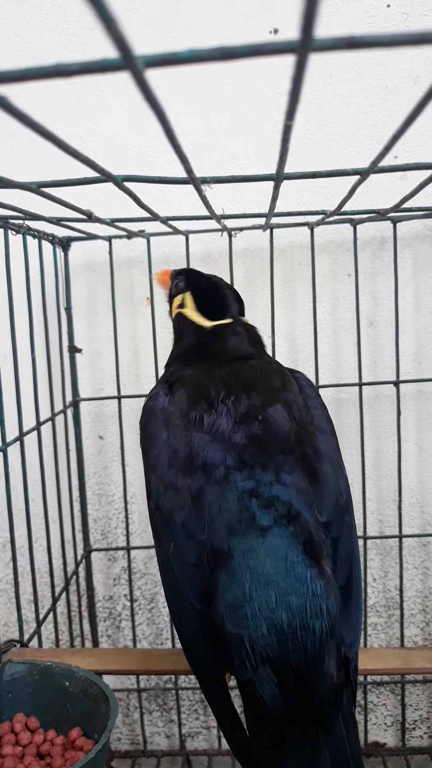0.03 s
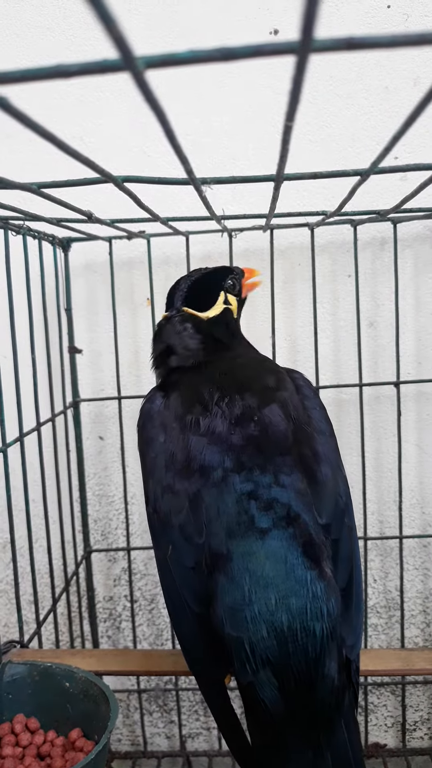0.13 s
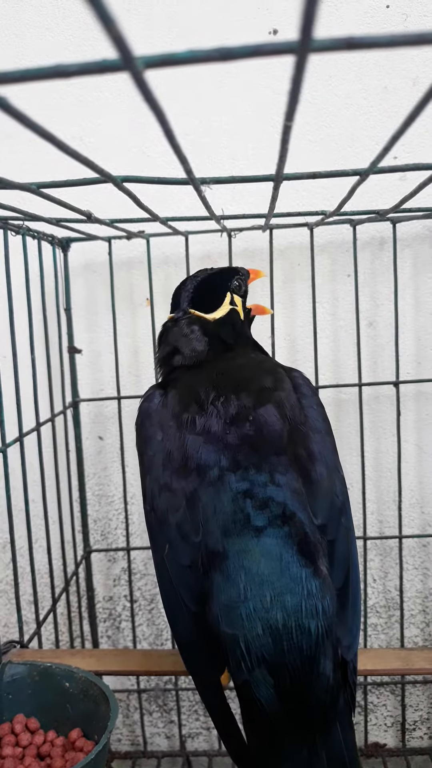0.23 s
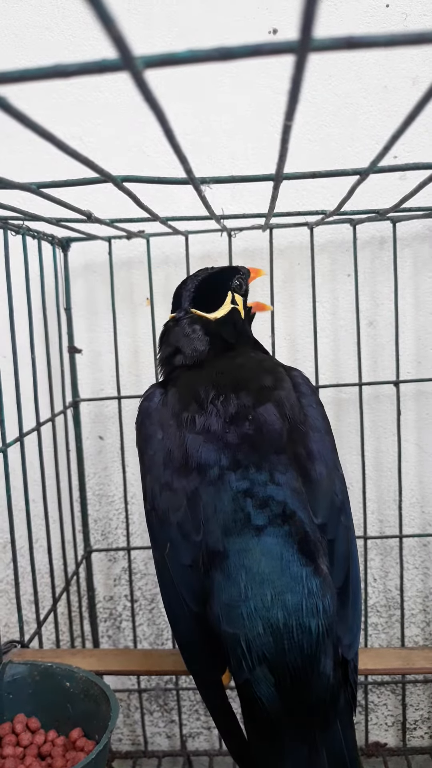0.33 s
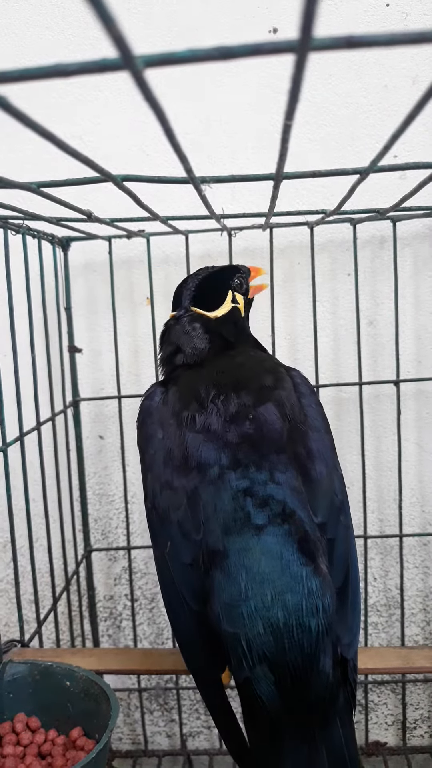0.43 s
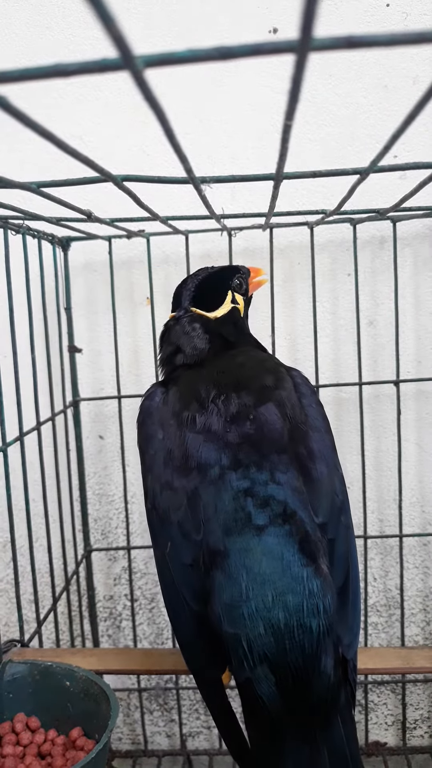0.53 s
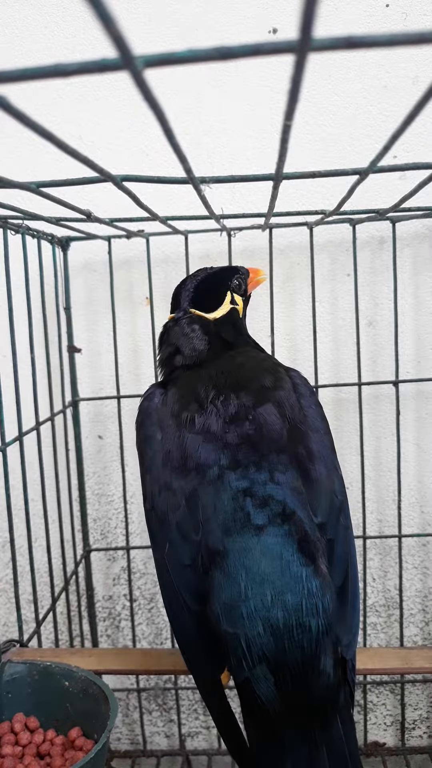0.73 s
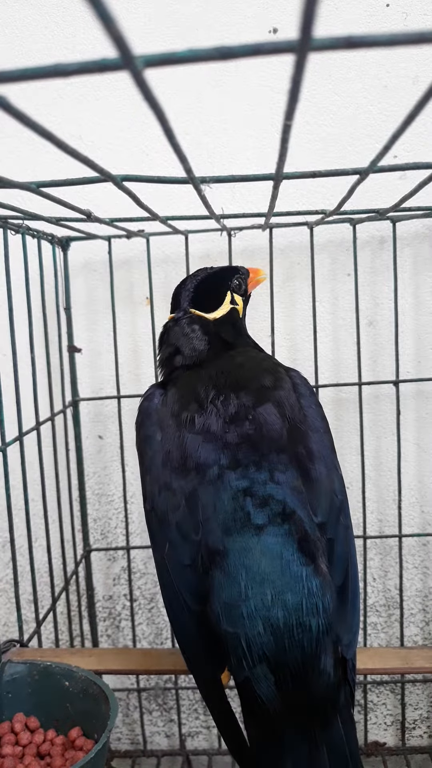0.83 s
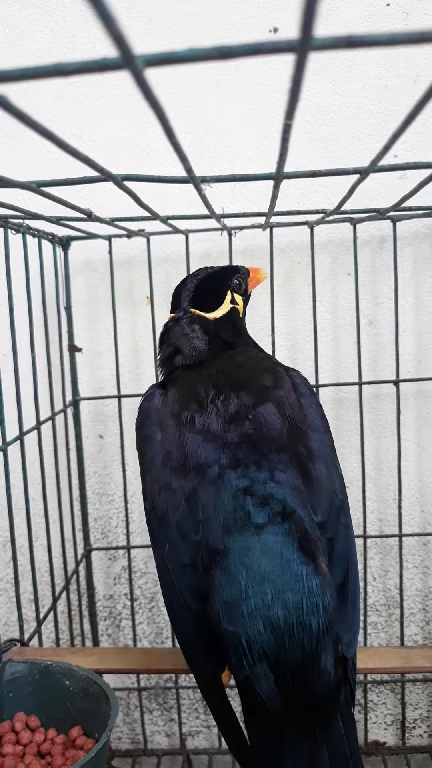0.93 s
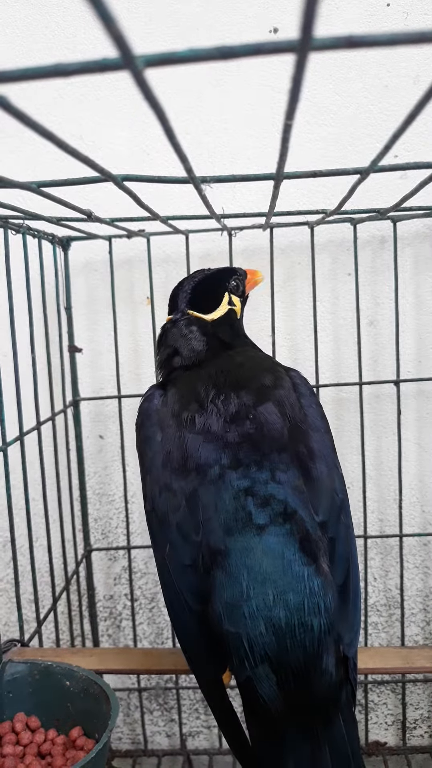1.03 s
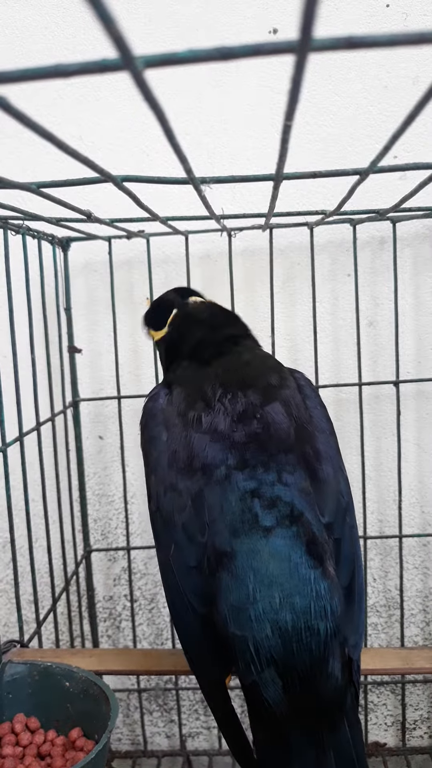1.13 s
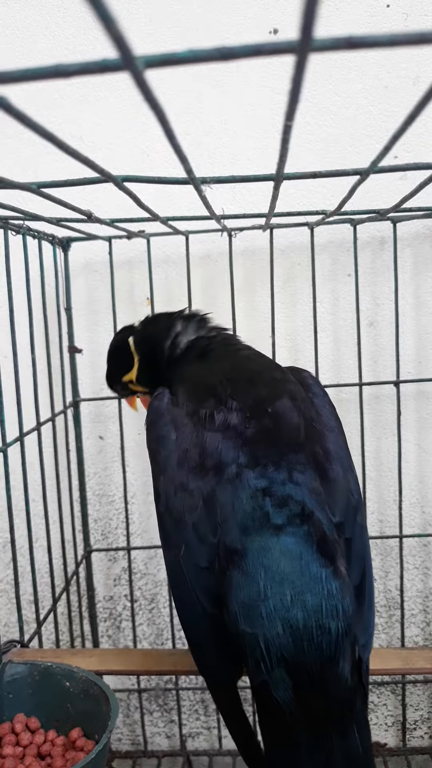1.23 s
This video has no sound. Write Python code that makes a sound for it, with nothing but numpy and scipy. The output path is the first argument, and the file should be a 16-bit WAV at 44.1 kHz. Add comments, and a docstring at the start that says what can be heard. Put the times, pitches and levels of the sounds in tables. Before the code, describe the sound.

A myna bird gives one loud, harsh rising whistle, then beak clicks and a falling note.

```python
"""Indoors, in a wire cage, a hill myna gives one loud, harsh whistle that climbs in two steps.
A fast flutter in the syrinx roughens it; near walls and the room answer. Two small beak clicks
follow, then a softer falling note begins. Low room noise and a faint hum lie under it all."""
import sys
import numpy as np
from scipy import signal
from scipy.fft import rfft, irfft, next_fast_len
from scipy.io import wavfile
from scipy.ndimage import uniform_filter1d, minimum_filter1d, map_coordinates

SR = 44100
rng = np.random.default_rng(int(sys.argv[2]) if len(sys.argv) > 2 else 0)


def materialize(psi):
    """Save the field psi as 16-bit PCM at rate SR to the path in sys.argv[1].

    A 1-D psi becomes a single channel; in a 2-D psi each row is a channel.
    """
    bounded = np.clip(np.atleast_2d(psi).T, -1, 1)
    quanta = np.round(bounded * 32767).astype(np.int16)
    wavfile.write(sys.argv[1], SR, quanta)


N = 57330

# (time [s], pitch [Hz], drive [dB], treble gain [dB])
LOUD_WHISTLE = [(.160, 724, -54.5, -3), (.183, 919.4, -28.5, -23.5), (.200, 1077, -21.5, -8),
                (.212, 1113, -19, -3.5), (.232, 1146, -24.5, 5.5), (.248, 1113, -20.5, -1),
                (.264, 1179, -22.5, -1.5), (.294, 1294, -22, -0.5), (.313, 1381, -21.5, 7.5),
                (.331, 1419, -26.5, 7.5), (.348, 1361, -39, 4)]
FALLING_NOTE = [(1.252, 1150, -64, -6), (1.265, 1103, -41, -9), (1.283, 956, -40, -12),
                (1.293, 920, -44.5, -3.5), (1.310, 856, -28, 7)]
# Tone colour: bright up to 4.5 kHz, dropping sharply above (frequency [Hz], gain [dB])
LOUD_WHISTLE_SPECTRUM = [(700, -8.5), (1100, -6), (1400, -1.5), (1850, 3.5), (2300, -2.5), (2800, -2),
                         (3050, 0.5), (3400, 2.5), (3800, 7.5), (4150, 4.5), (4520, 7), (4750, -11.5),
                         (5000, -10), (5600, -15), (6100, -18.5), (6950, -32.5), (7400, -42), (8500, -42),
                         (10000, -64.5), (12500, -59), (14200, -52.5), (16000, -56)]
# Tone colour: duller, dropping above 2.8 kHz (frequency [Hz], gain [dB])
FALLING_NOTE_SPECTRUM = [(700, -22), (1050, -2), (1400, 5), (1850, 1), (2200, -0.5), (2750, 4.5),
                         (3150, -8), (3600, -22), (5000, -38), (8000, -50)]
# Air in the syrinx (frequency [Hz], gain [dB])
HISS_SPECTRUM = [(1500, -1), (4000, -3.5), (6500, -1.5), (7500, -13), (9000, -15), (10500, -25),
                 (16000, -32)]
# Flutter, jitter and rasp (time [s], scale [1])
ROUGHNESS = [(.17, .4), (.20, .9), (.225, .8), (.25, 1.0), (.275, 1.35), (.295, 1.3), (.315, .8),
             (.335, .9), (1.25, .8)]
FLUTTER_HZ, REF_PITCH_HZ = 172.8, 1131.5  # flutter rate tracks pitch
FLUTTER_FM, FLUTTER_AM, FLUTTER_DRIFT, JITTER = .018, .32, .03, .013
RASP_DB, RASP_DB_PER_HARMONIC, RASP_WIDTH_HZ = -19, 2.5, 900
TREBLE_FROM_HZ, TREBLE_FULL_HZ = 2370, 3080
HISS_DB, HISS_LOSS_DB_PER_HZ = -17, .3


def myna(note, spectrum, harmonics=14, fade_s=.0017):
    """Syrinx harmonics, fluttering in pitch and strength, given a tone colour; hiss on top."""
    t = np.arange(N) / SR
    times, *columns = np.transpose(note)
    pitch_hz, drive_db, treble_db = [np.interp(t, times, column) for column in columns]
    gate = np.clip((t - times[0]) / fade_s, 0, 1) * np.clip((times[-1] - t) / fade_s, 0, 1)
    rough = np.interp(t, *np.transpose(ROUGHNESS))
    flutter_hz = FLUTTER_HZ * pitch_hz / REF_PITCH_HZ * (1 + FLUTTER_DRIFT * wobble(80))
    flutter = rough * np.sin(phase_rad(flutter_hz * (t > times[0])))
    phase = phase_rad(pitch_hz * (1 + FLUTTER_FM * flutter + JITTER * rough * wobble(700)))
    drive = gate * amp(drive_db) * (1 + FLUTTER_AM * flutter)
    voice = np.zeros(N)
    for k in range(1, harmonics + 1):
        treble_share = np.clip((k * pitch_hz - TREBLE_FROM_HZ) / (TREBLE_FULL_HZ - TREBLE_FROM_HZ), 0, 1)
        rasp_depth = rough * amp(RASP_DB + RASP_DB_PER_HARMONIC * min(k - 2, 10))
        rasp = rasp_depth * (wobble(RASP_WIDTH_HZ) + 1j * wobble(RASP_WIDTH_HZ))
        harmonic = np.exp(1j * (k * phase + rng.uniform(0, 2 * np.pi)))
        voice += amp(treble_share * treble_db) * np.imag((1 + rasp) * harmonic)
    hiss_loss_db = HISS_LOSS_DB_PER_HZ * np.maximum(pitch_hz - REF_PITCH_HZ, 0)
    hiss = noise(HISS_SPECTRUM) * amp(HISS_DB + treble_db - hiss_loss_db)
    return coloured(np.sqrt(2) * voice * drive, spectrum) + hiss * drive


# (time [s], level [dB], rise [s], t60 [s], ring [Hz])
BEAK_CLICKS = [(0.5602, -31, 0.0003, .005, 4630), (0.5636, -24, 0.00039, 0.021, 4400),
               (1.1410, -35, 0.0045, 0.013, 4230)]
# (frequency [Hz], gain [dB])
CLICK_SPECTRUM = [(300, -29), (1900, -12.5), (3500, -12), (5000, -5.5), (5900, -15), (7600, -13),
                  (9500, -33), (15500, -34)]


def beak_clicks(ring_db=16, width_hz=520):
    """Short dry snaps, each ringing in one broad resonance."""
    out = np.zeros(N)
    for start_s, level_db, rise_s, t60_s, ring_hz in BEAK_CLICKS:
        age_s = np.maximum(np.arange(N) / SR - start_s, 0)
        snap = noise(CLICK_SPECTRUM)
        ring = filtered(snap, lambda hz: amp(ring_db * np.exp(-.5 * ((hz - ring_hz) / width_hz) ** 2)))
        envelope = np.minimum(age_s / rise_s, 1) * decay(np.maximum(age_s - rise_s, 0), t60_s)
        out += amp(level_db) * unit_rms(ring) * envelope
    return out


# (delay [s], gain [dB])
NEAR_WALLS = [(.0023, -13), (.0044, -15), (.0098, -27.5)]
# (frequency [Hz], gain [dB])
TAIL_SPECTRUM = [(500, -8), (1350, 1), (2200, 5.5), (2780, 5), (3400, 1), (4200, -6.5), (8000, -4)]
SCATTER_DB, TAIL_DB = -5.5, -12.5


def room(x):
    """Direct sound, wall reflections, quick scatter from cage and corner, longer room tail."""
    walls = filtered(x, lambda hz: sum(amp(db) * np.exp(-2j * np.pi * hz * s) for s, db in NEAR_WALLS))
    scatter = amp(SCATTER_DB) * echoes(x, t60_s=.091)
    tail = amp(TAIL_DB) * coloured(echoes(x, t60_s=.29), TAIL_SPECTRUM)
    return x + walls + scatter + tail


# Room noise (frequency [Hz], gain [dB])
AIR_SPECTRUM = [(15, -50), (25, -35), (91, -2), (129, -1.5), (173, -2.5), (209, -5.5), (267, 0.5),
                (305, -10), (389, -5), (421, -9), (495, -6), (614, -11), (684, -10), (1080, -12.5),
                (1170, -14.5), (4260, -19), (7300, -27), (9550, -42), (15500, -39)]
# (frequency [Hz], level [dB])
HUM_TONES = [(256, -70.5), (388, -68), (502, -65)]
AIR_DB, AIR_REF_S, AIR_SAG_DB_PER_S = -44, 1.09, 2


def background():
    """Low room noise, slowly easing, with a wavering hum."""
    t = np.arange(N) / SR
    air = noise(AIR_SPECTRUM) * amp(AIR_DB + AIR_SAG_DB_PER_S * (AIR_REF_S - t) + .21 * wobble(30))
    hum = np.zeros(N)
    for hz, level_db in HUM_TONES:
        tone = np.sqrt(2) * np.sin(phase_rad(hz + 9 * wobble(25)))
        hum += tone * amp(level_db + 1.8 * wobble(9.8))
    return air + hum


def amp(db):
    """Decibels to gain."""
    return 10 ** (np.asarray(db) / 20)


def unit_rms(x):
    """Scale to rms 1."""
    return x / np.sqrt(np.mean(x ** 2) + 1e-20)


def wobble(knots_per_s):
    """Smooth random curve."""
    return map_coordinates(rng.standard_normal(N), [np.arange(N) * knots_per_s / SR], mode="wrap")


def phase_rad(hz):
    """Running phase of a changing frequency."""
    return 2 * np.pi * np.cumsum(hz) / SR


def decay(age_s, t60_s):
    """Gain falling 60 dB in t60_s."""
    return amp(-60 * age_s / t60_s)


def filtered(x, response):
    """Apply a frequency response."""
    size = next_fast_len(N + SR // 2)
    return irfft(rfft(x, size) * response(np.fft.rfftfreq(size, 1 / SR)), size)[:N]


def coloured(x, spectrum):
    """Apply (frequency [Hz], gain [dB]) points on a log frequency axis."""
    points_hz, gains_db = np.transpose(spectrum)
    return filtered(x, lambda hz: amp(np.interp(np.log(hz + 1), np.log(points_hz + 1), gains_db)))


def noise(spectrum):
    """Coloured noise, rms 1."""
    return unit_rms(coloured(rng.standard_normal(N), spectrum))


def echoes(x, t60_s, delay_s=.005):
    """Convolve with a delayed diffuse tail of unit energy."""
    tail = rng.standard_normal(N) * decay(np.arange(N) / SR, t60_s)
    impulse = np.pad(tail / np.linalg.norm(tail), (round(delay_s * SR), 0))
    return signal.fftconvolve(x, impulse)[:N]


def scene():
    """The bird in its room, mono."""
    calls = myna(LOUD_WHISTLE, LOUD_WHISTLE_SPECTRUM) + myna(FALLING_NOTE, FALLING_NOTE_SPECTRUM)
    return (room(calls + beak_clicks()) + background())[None]


TOP_HZ, CEILING, LIMITER_S = 15800, .95, .004


def record(dry):
    """Band limit and smooth peak limiter."""
    sound = filtered(dry[0], lambda hz: hz < TOP_HZ)
    window = round(LIMITER_S * SR)
    needed_gain = CEILING / np.maximum(np.abs(sound), CEILING)
    gain = uniform_filter1d(minimum_filter1d(needed_gain, 2 * window), window)
    return filtered(sound * gain, lambda hz: hz < TOP_HZ)[None]


dry = scene()
out = record(dry)
materialize(out)
```